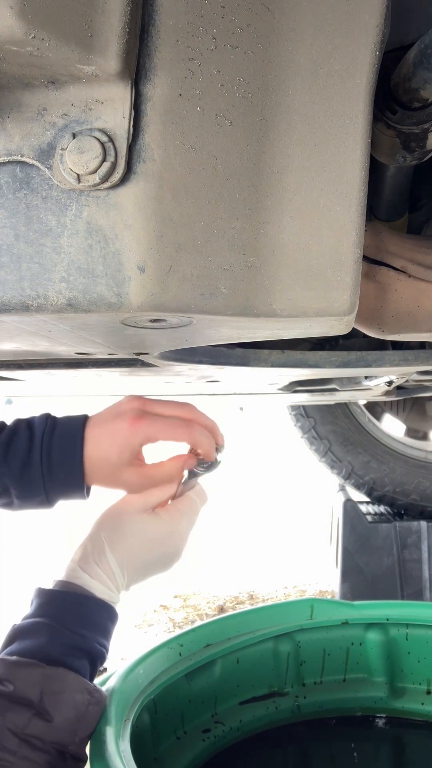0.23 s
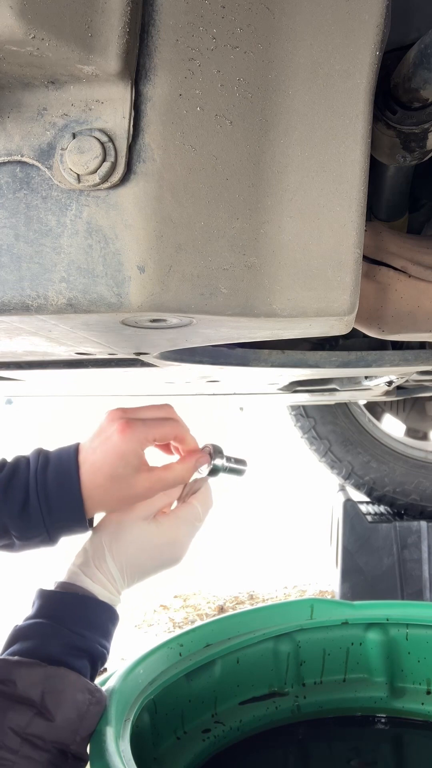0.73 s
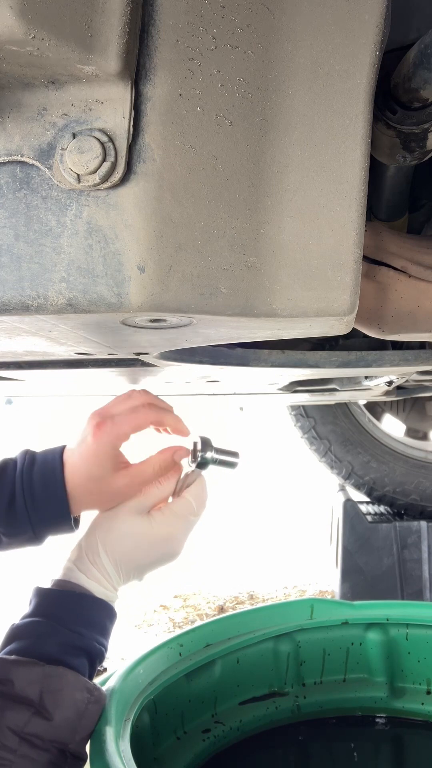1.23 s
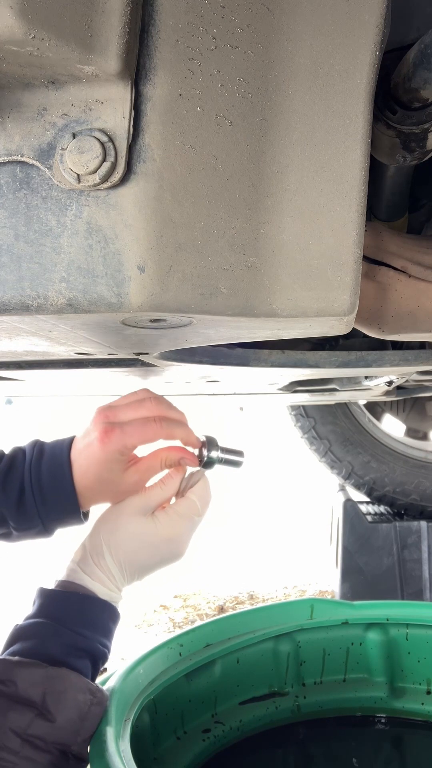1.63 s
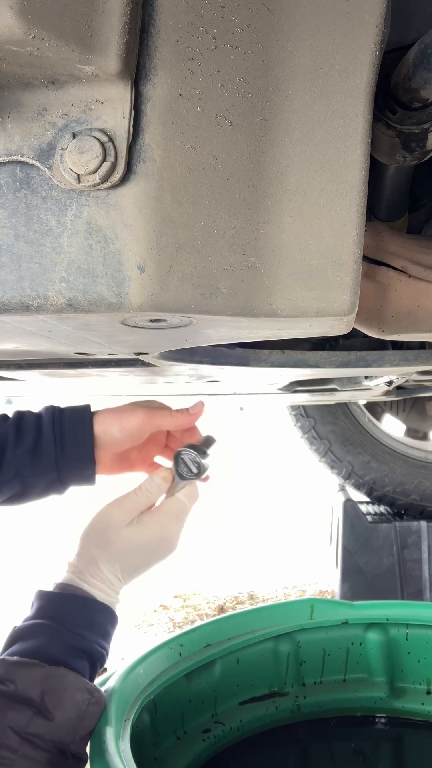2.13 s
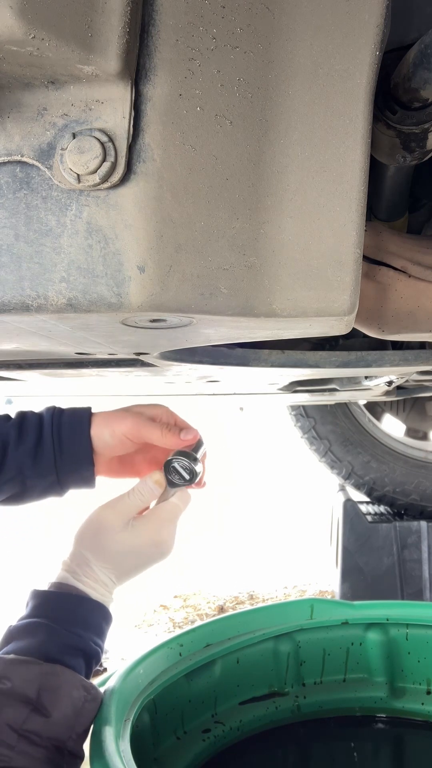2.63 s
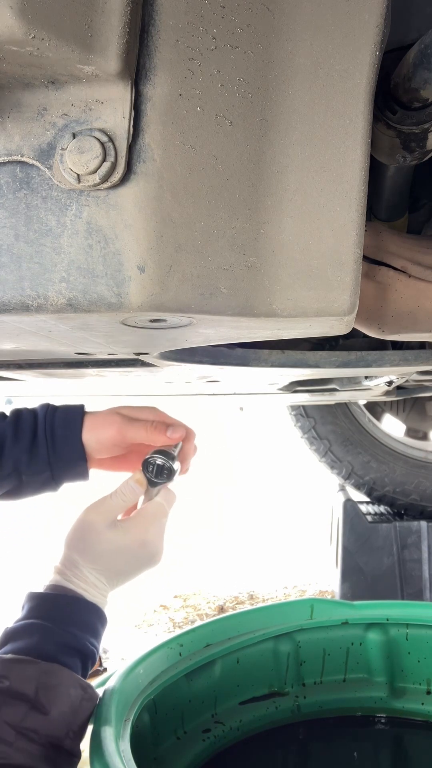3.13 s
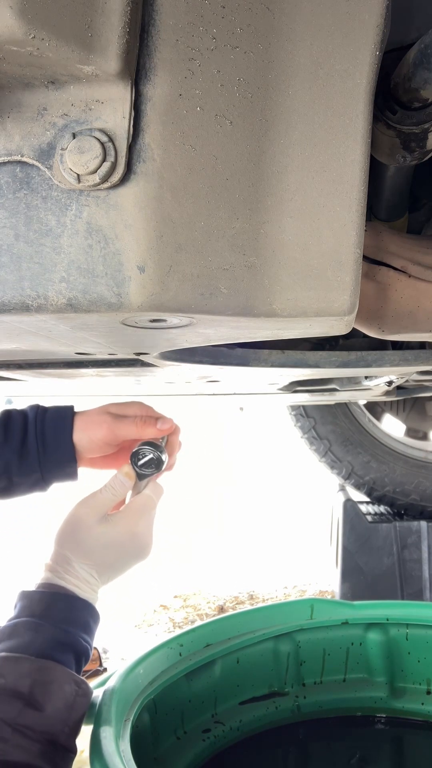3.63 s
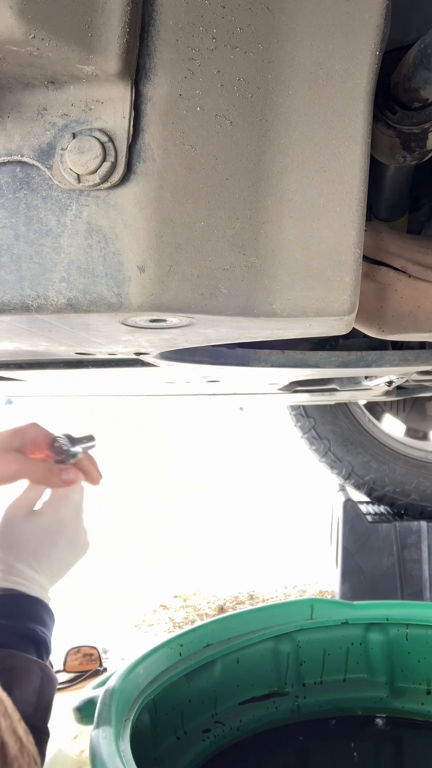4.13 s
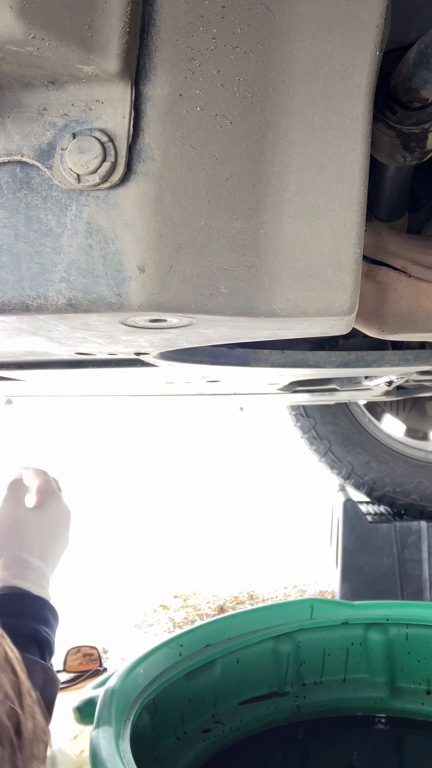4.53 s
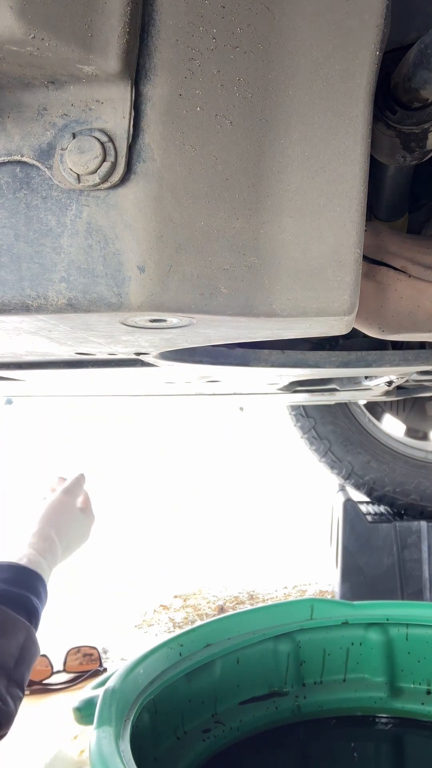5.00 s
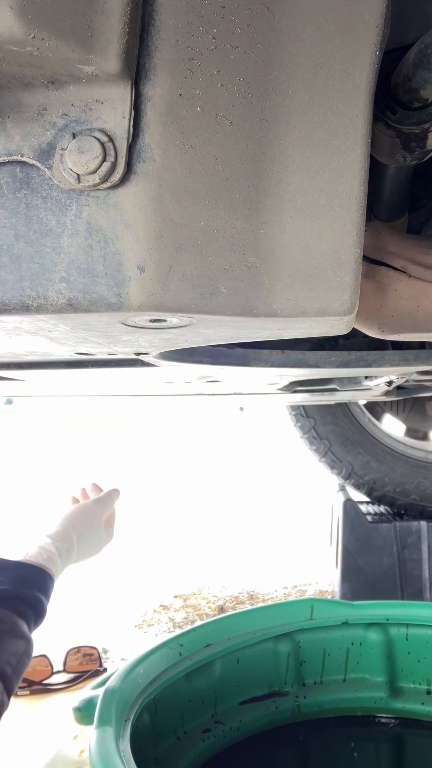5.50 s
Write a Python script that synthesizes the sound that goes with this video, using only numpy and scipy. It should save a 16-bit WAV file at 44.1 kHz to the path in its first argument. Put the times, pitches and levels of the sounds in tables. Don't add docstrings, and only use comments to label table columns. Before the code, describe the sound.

Under a vehicle, fingers rub over small steel parts that clink and click in quick ratchet runs, then cloth rustles over a low traffic hum.

```python
import sys
import numpy as np
from scipy import signal
from scipy.fft import rfft, irfft, next_fast_len
from scipy.io import wavfile
from scipy.ndimage import uniform_filter1d

SR = 44100
rng = np.random.default_rng(int(sys.argv[2]) if len(sys.argv) > 2 else 0)


def pcm_store(signal):
    levels = np.round(np.clip(np.atleast_2d(signal), -1, 1) * 32767)
    wavfile.write(sys.argv[1], SR, levels.astype(np.int16).T)


def amplitude_ratio(level_db):
    exponent = np.asarray(level_db, float) / 20
    return 10 ** exponent


N = 254016
SIZE = next_fast_len(N + SR // 4)
HZ = np.maximum(np.fft.rfftfreq(SIZE, 1 / SR), 1.)
TIME = np.arange(N) / SR


def over_hz(table):
    hz, value = np.transpose(table)
    return np.interp(np.log(HZ), np.log(np.maximum(hz, 1.)), value)


def colour(x, gain):
    return irfft(rfft(x, SIZE) * gain, SIZE)[..., :N]


def unit(x):
    return x / np.sqrt(np.mean(x ** 2))


def walk(rate_hz):
    hold = int(SR / rate_hz)
    steps = np.repeat(rng.standard_normal((1, N // 400)), hold, axis=1)
    smooth = uniform_filter1d(uniform_filter1d(steps, hold), hold)
    return unit(smooth[:, :N])


def ring(x, hz, t60_s):
    pole = np.exp(2j * np.pi * hz / SR - np.log(1000) / (max(t60_s, .0003) * SR))
    return signal.lfilter([1], [1, -pole], x).imag


# start_s, ring_db, gear_re_ring_db
PAWL_CLICKS = [(2.8777, -17, -26.5), (2.8795, -25.5, -24.5), (2.8844, -32.5, -29), (2.9339, -15, -25),
               (2.9557, -14.5, -25), (2.9738, -15, -24), (2.9899, -15.5, -21.5), (3.0067, -17.5, -20),
               (3.0269, -17.5, -14), (3.3757, -15.5, -21), (3.3850, -30.5, -12), (3.3977, -15, -19),
               (3.412, -20, -4.5), (3.431, -17, -13)]
# start_s, ring_db, socket_re_ring_db, gear_re_ring_db
PART_CLINKS = [(0.7455, -29, -15, -14), (0.7504, -29.5, -27, -39), (0.7602, -45, -9, -16),
               (0.776, -40, -5, -16), (0.793, -45, -3.5, -8), (0.8086, -52, -1, -7),
               (0.9772, -36.5, -24, -37), (0.9814, -38, -15, -17), (2.2318, -67.5, 19, -9),
               (3.0739, -47, -8.5, -11), (3.361, -43.5, 1.5, -7.5), (3.4800, -42.5, -13.5, -5.5),
               (3.5065, -52.5, -4, -3), (4.491, -55.5, -24, -3), (4.69, -39, -2, -6)]
# start_s, ring_db, handle_re_ring_db, socket_re_ring_db
HANDLE_TAPS = [(0.8307, -54.5, -2, 3), (0.863, -82, 6, -2), (1.0294, -66, -4, -2), (2.404, -69, 10, -3),
               (2.8436, -53.5, 0, -5), (3.0858, -33.5, -9, 0.5), (3.0871, -32.5, -1, -0.5),
               (3.0913, -34, 1.5, 0), (3.354, -61, 13, 5), (3.485, -36, -8.5, 2.5), (3.705, -72.5, 11, 11),
               (3.7222, -66, 8, 7), (3.815, -69, 6, 8), (5.188, -50.5, 1, -6), (5.5414, -56, 0, 2)]


def steel_contacts():
    pawl = [(s, db, -28, -23, gear_db, .003) for s, db, gear_db in PAWL_CLICKS]
    clinks = [(s, db, socket_db - 23.5, socket_db, gear_db, .003)
              for s, db, socket_db, gear_db in PART_CLINKS]
    taps = [(s, db, handle_db, socket_db, -13.5, .00344) for s, db, handle_db, socket_db in HANDLE_TAPS]
    return pawl + clinks + taps


# mode_hz, level_db, t60_s
RING_MODES = [(10890, 0, 0.027), (11000, -10, 0.023), (11600, -16.5, 0.024), (12420, -9, .016),
              (12570, -19, .01), (10080, -19.5, 0.013), (9000, -18, .02), (14250, -27.5, 0.012),
              (15700, -15, .015)]
# mode_hz, level_db, t60_s
HANDLE_MODES = [(1630, 2.5, 0.023), (2480, -10.5, 0.015)]
# mode_hz, level_db, t60_s
SOCKET_MODES = [(4374, 2.5, 0.029), (4430, -9.5, 0.0146), (5140, -23, 0.05), (3780, -11, 0.012)]
# mode_hz, level_db, t60_s
GEAR_MODES = [(7900, 1, 0.028), (8100, -7.5, .035), (7220, -12.5, 0.0074)]
# band_hz, level_db
CONTACT_SPECTRUM = [(1600, -30.5), (2200, -30), (3200, -19), (4500, -9), (6200, -18), (8500, -15.5),
                    (11000, -12.5), (13000, -9.5), (16200, -18.5)]
SEATED_S, LOOSE_SHIFT = 2.0, 1.075


def steel():
    out, span = np.zeros(N + SR), np.arange(SR // 12) / SR
    crack = np.roll(irfft(amplitude_ratio(over_hz(CONTACT_SPECTRUM)), SIZE), 64)[:128] * np.hanning(128)
    for s, db, handle_db, socket_db, gear_db, chatter_s in steel_contacts():
        bounce = rng.standard_normal(len(span)) * (rng.random(len(span)) < .3)
        scrape = 0.11 * np.exp(-span / 0.0081)
        bounce = bounce * (np.exp(-span / np.clip(chatter_s, .0005, .02)) + scrape)
        blow = 0.12 * bounce
        blow[0] = 0.45
        contact = np.convolve(.55 * blow + .48 * bounce, crack)
        sound = amplitude_ratio(18.0) * contact[64:64 + len(span)]
        socket_shift = LOOSE_SHIFT if s < SEATED_S else 1
        parts = [(RING_MODES, -4.5, 1), (HANDLE_MODES, handle_db + 5, 1),
                 (SOCKET_MODES, socket_db + 0.83, socket_shift), (GEAR_MODES, gear_db + .6, 1)]
        for modes, part_db, shift in parts:
            for hz, mode_db, t60_s in modes:
                chance = rng.standard_normal()
                tone = ring(blow, shift * hz * (1 + 0.0041 * chance), t60_s)
                sound += amplitude_ratio(part_db + mode_db + 1.5 * chance) * tone / np.max(np.abs(tone))
        start = int(s * SR)
        out[start:start + len(span)] += amplitude_ratio(db) * sound
    return colour(out[:N], 1 / (1 + (1350 / HZ) ** 12))


# start_s, level_db, lag_s (at 100 Hz), t60_s (at 100 Hz), t60_s (at 4 kHz)
KNOCK_TIMES = [
    (1.934, -49, .02, 0.12, 0.042),
    (4.386, -44, 0.011, .13, 0.043),
    (4.853, -60, .005, .03, 0.017),
]
# band_hz, level_db (per Hz)
KNOCK_SPECTRA = [
    [(50, -4.5), (85, 3.5), (160, -6.5), (280, -7), (440, -6), (800, -17.5), (1000, -49), (1300, -60)],
    [(50, -9.5), (100, -2), (300, -15), (500, -11), (870, -1.5), (1250, -20), (1700, -13), (2400, -15.5),
     (4300, -18), (6000, -34.5), (15000, -42.5)],
    [(100, -20), (250, -15), (450, -5.5), (700, -16), (1060, 1), (1600, -16), (2500, -1.5), (3700, -5),
     (4800, -20), (7000, -64)],
]


def knocks():
    out, span = np.zeros(N + SR), np.arange(SR // 3) / SR
    bands_hz = 50 * 2 ** np.arange(0, 8.3, 1 / 3)
    for (s, db, lag_s, t60_low, t60_high), spectrum in zip(KNOCK_TIMES, KNOCK_SPECTRA):
        hz, level_db = np.transpose(spectrum)
        start = int(s * SR)
        for f in bands_hz:
            place = np.log(f / 100) / np.log(40)
            t60_s = t60_low * (t60_high / t60_low) ** place
            late = np.maximum(span - lag_s * (100 / f) ** .9, 0)
            shake = rng.standard_normal(len(span)) * (late > 0) * amplitude_ratio(-60 * late / t60_s)
            shake[np.argmax(late > 0)] = 24 * np.sqrt(f / 2500)
            band = ring(ring(shake, f, 7 / f), f, 7 / f)
            band_db = np.interp(np.log(f), np.log(hz), level_db, right=-99)
            gain = amplitude_ratio(db + band_db) * np.sqrt(f / 400)
            out[start:start + len(span)] += gain * unit(band) * 1.26
    return out[:N]


# start_s, hold_s, level_db, sheen_re_rub_db
FINGER_STROKES = [(0.0, 0.07, -78.5, -8), (.13, 0.099, -72, -9), (.295, 0.098, -70.5, -10.5),
                  (.49, 0.089, -66.5, -8), (.735, 0.12, -77, 3.5), (.89, 0.037, -69, -7),
                  (.97, 0.049, -67, -4.5), (1.114, 0.088, -66, -4.5), (1.568, 0.053, -66, -5.5),
                  (1.73, 0.044, -67.5, -6), (1.89, .17, -65.5, -7.5), (1.932, 0.037, -66.5, 6),
                  (2.135, 0.15, -64.5, -4), (2.4, 0.016, -73, -6), (2.8, 0.327, -71, -2.5),
                  (3.355, .17, -72.5, -0.5), (3.608, .005, -85, -8.5), (3.722, .015, -71, -17)]
# start_s, hold_s, level_db, sheen_re_rub_db
CLOTH_SWIPES = [(4.065, 0.028, -70.5, 1.5), (4.375, 0.083, -68, -8), (4.488, 0.0091, -73.5, 5),
                (4.6, 0.13, -61, -4.5), (4.8, .08, -62, -4), (4.9, .03, -58, -3.5), (5.035, 0.036, -55, -3),
                (5.115, .02, -58.5, -2.5), (5.165, 0.038, -52, -4), (5.235, 0.012, -59.5, -2.5),
                (5.375, 0.0076, -68.5, 4), (5.51, 0.28, -56.5, -4.5), (5.74, .02, -50, -8)]
# time_s, level_db, body_re_rub_db
ARM_DRAG = [
    (3.6, -99, -1),
    (3.76, -78.5, -1.5),
    (4.0, -68.5, -1.5),
    (4.2, -72.5, 3.5),
    (4.6, -67.5, 3),
    (5.0, -66.5, 0),
    (5.2, -65.5, 4.5),
    (5.42, -65.5, -5),
    (5.76, -59, -12),
]


def strokes():
    t = TIME[::64]
    s, db, body_db = np.transpose(ARM_DRAG)
    arm_db = np.interp(t, s, db, left=-120)
    arm = amplitude_ratio(np.array([arm_db, arm_db - 12.5, arm_db + np.interp(t, s, body_db)]))
    rest = amplitude_ratio(np.array([-84.5, -87.5, -90.5]))
    power = arm ** 2 + rest[:, None] ** 2
    for table, body_re_rub_db in ((FINGER_STROKES, -9.5), (CLOTH_SWIPES, -8.5)):
        for s, hold_s, db, sheen_db in table:
            rise_db = 453 * np.maximum(s - t, 0)
            fall_db = 314 * np.maximum(t - s - hold_s, 0)
            colours = amplitude_ratio(np.array([0, sheen_db, body_re_rub_db]))
            power = power + np.outer(colours, amplitude_ratio(db - rise_db - fall_db)) ** 2
    return [np.interp(TIME, t, gain) for gain in np.sqrt(power)]


# band_hz, level_db
RUB_SPECTRUM = [(1000, -20), (1400, -4), (1900, -5), (2400, -2), (2850, -7), (3300, -4), (3800, -4.5),
                (4650, -4.5), (5000, -10), (6000, -14.5), (7500, -36)]
# band_hz, level_db
SHEEN_SPECTRUM = [(5000, -28.5), (6200, -3), (8000, -0.5), (11000, -4), (13000, -6.5), (15500, -12),
                  (16500, -42)]
# band_hz, level_db
BODY_SPECTRUM = [(200, -14.5), (400, 1), (600, -0.5), (1000, -1), (1400, -7), (2000, -28.5)]


def rustle():
    out, stir = 0, walk(30)
    spectra = (RUB_SPECTRUM, SHEEN_SPECTRUM, BODY_SPECTRUM)
    for spectrum, gain, boost_db in zip(spectra, strokes(), (3.5, .9, 5.5)):
        grains = rng.standard_normal((2, N)) * amplitude_ratio(4.95 * rng.standard_normal(N))
        hiss = unit(colour(grains, amplitude_ratio(over_hz(spectrum))))
        flicker_db = 1.2 * stir + 1.3 * walk(45)
        out = out + hiss * gain * amplitude_ratio(boost_db + flicker_db)
    return out


# time_s, pitch_hz, level_db
BIRD_PEEP = [
    (1.40, 7050, -102),
    (1.43, 6900, -84),
    (1.47, 6830, -83),
    (1.50, 6840, -95),
]


def bird():
    s, hz, db = np.transpose(BIRD_PEEP)
    tone = np.sin(2 * np.pi * np.cumsum(np.interp(TIME, s, hz)) / SR)
    return tone * amplitude_ratio(np.interp(TIME, s, db, left=-150, right=-150))


# band_hz, level_db (per Hz)
AIR_SPECTRUM = [(12, -47.5), (25, -24.5), (55, -0.5), (85, -1), (135, -6.5), (200, -13), (320, -17.5),
                (430, -13.5), (520, -24), (700, -32), (1100, -40.5), (2500, -53), (6000, -51.5),
                (16000, -58)]
# time_s, level_db
TRAFFIC_SWELL = [
    (0, -50),
    (.38, -56),
    (1.0, -51.5),
    (1.9, -54.5),
    (2.5, -58.5),
    (3.3, -54),
    (3.75, -53.5),
    (4.6, -52.5),
    (5.3, -54.5),
    (5.6, -52),
]


def air():
    bed = unit(colour(rng.standard_normal((2, N)), amplitude_ratio(over_hz(AIR_SPECTRUM))))
    bass = colour(bed, 1 / (1 + (HZ / 300) ** 4))
    swell_db = np.interp(TIME, *np.transpose(TRAFFIC_SWELL)) + 1.7 * walk(9)
    return bass * amplitude_ratio(swell_db) + (bed - bass) * amplitude_ratio(-53.5)


def underbody(hits):
    span = np.arange(SR // 6) / SR
    t60_s = 0.057
    tails = rng.standard_normal((2, len(span))) * amplitude_ratio(-60 * span / t60_s) * (span > .001)
    tails = tails / np.sqrt(np.sum(tails ** 2, axis=1, keepdims=True))
    echo = signal.fftconvolve(hits[None], tails, axes=1)[:, :N]
    return np.array([hits + amplitude_ratio(-7) * echo[0], amplitude_ratio(-2.0) * echo[1]])


# band_hz, unrelated_share (0 to 1)
PORT_INCOHERENCE = [(50, 0), (170, 0.7), (400, 0.2), (600, 0.57), (900, 0.35), (2000, 0.75), (5000, 0.03),
                    (5900, 1), (6400, 0.11), (16000, 0)]


def ports(common, stray, phase):
    apart = np.clip(over_hz(PORT_INCOHERENCE), 0, 1)
    turn = np.exp(1j * over_hz(phase) / 2)
    turn = turn * amplitude_ratio(.7 / (1 + (HZ / 1500) ** 2))
    shared, opposed = np.sqrt(1 - apart / 2), np.sqrt(apart / 2)
    left = colour(common, shared * turn) + colour(stray, opposed * turn)
    right = colour(common, shared / turn) - colour(stray, opposed / turn)
    return np.array([left, right])


# band_hz, left_lead_rad
ABOVE_PHASE = [(0, -2), (430, 0.77), (690, 4.5), (1210, 3), (1980, 6), (2330, 4), (3450, 4.0), (4390, 4),
               (4820, 3.5), (5080, 4.5), (5770, 0.05), (6370, 0), (16400, -0.47)]
# band_hz, left_lead_rad
SIDE_PHASE = [(50, -0.65), (520, 1.5), (780, 1.65), (1100, 1.84), (1700, 5), (2400, 4.5), (3400, 4.5),
              (4800, 3.5), (5800, 4.5), (6400, 0)]


def scene():
    common, stray = rustle() + air()
    bed = np.array([common, colour(stray, 1 / (1 + (HZ / 6300) ** 60))])
    above = underbody(steel() + bird()) + bed
    return ports(*above, ABOVE_PHASE) + ports(*underbody(knocks()), SIDE_PHASE)


def roll_off(x):
    return signal.sosfilt(signal.butter(12, 16830, fs=SR, output="sos"), x)


def record(dry):
    mix = colour(dry, amplitude_ratio(-22 / (1 + (16000 / HZ) ** 120)))
    return roll_off(mix)


dry = scene()
out = record(dry)
pcm_store(out)
```